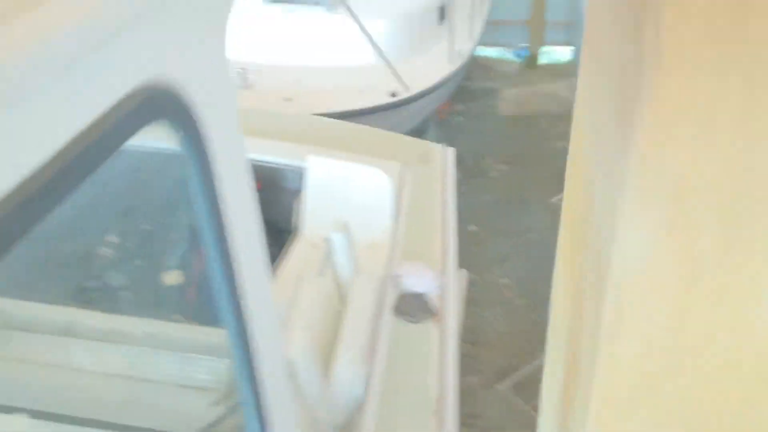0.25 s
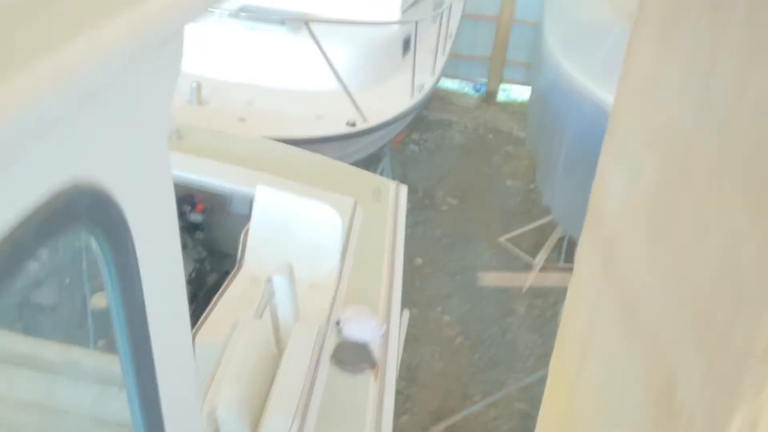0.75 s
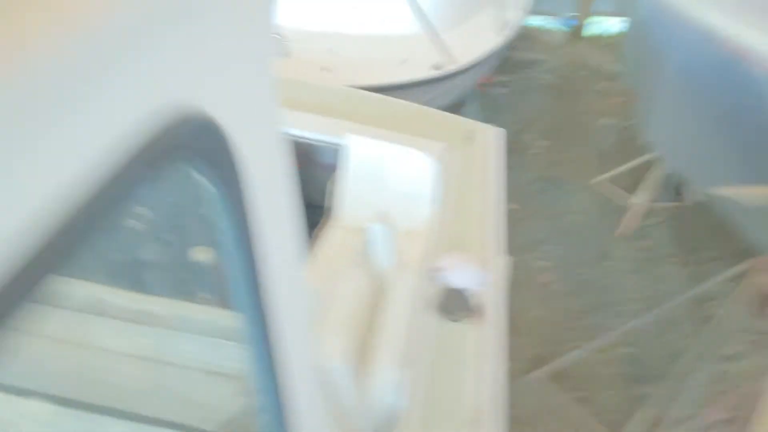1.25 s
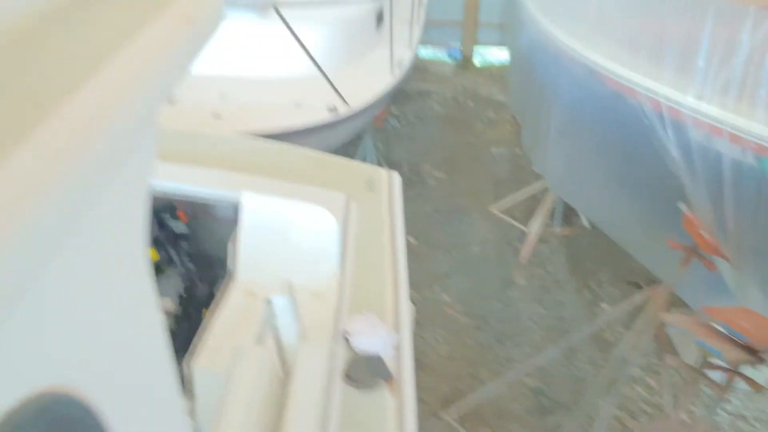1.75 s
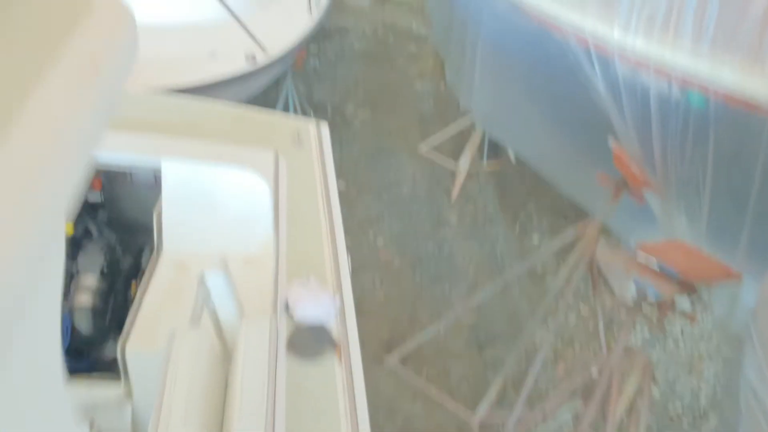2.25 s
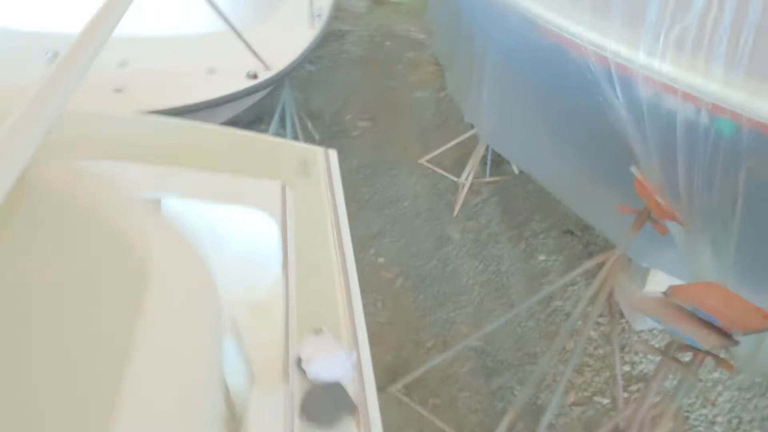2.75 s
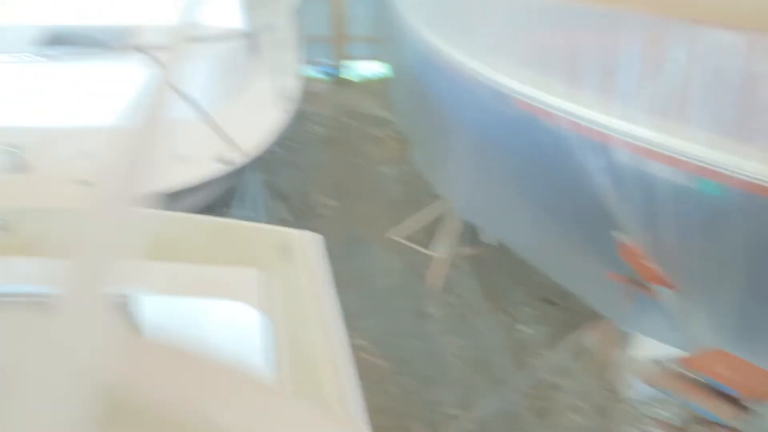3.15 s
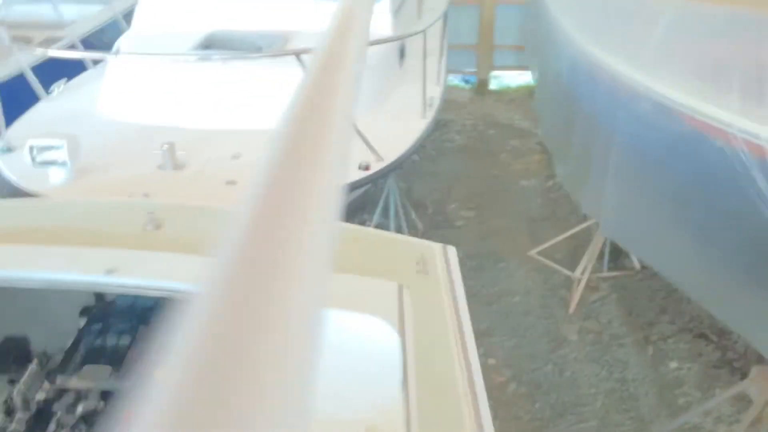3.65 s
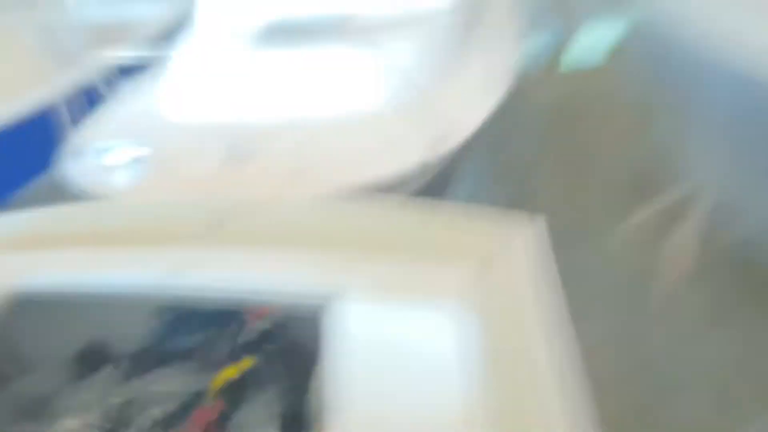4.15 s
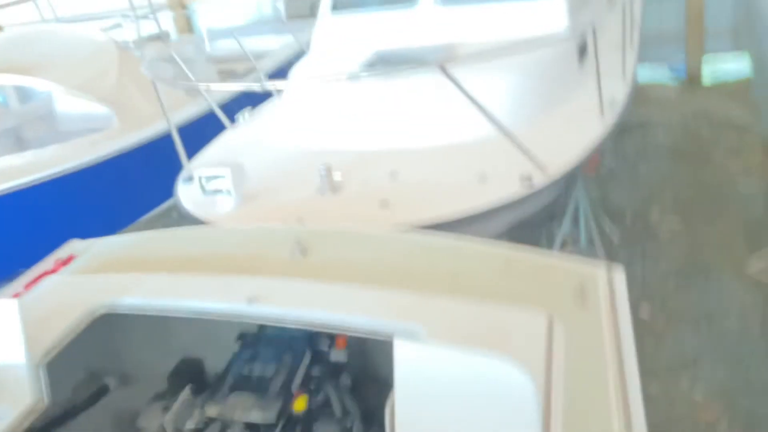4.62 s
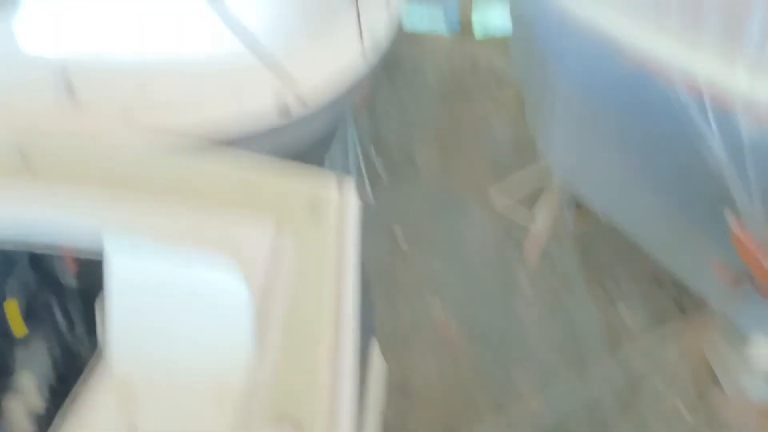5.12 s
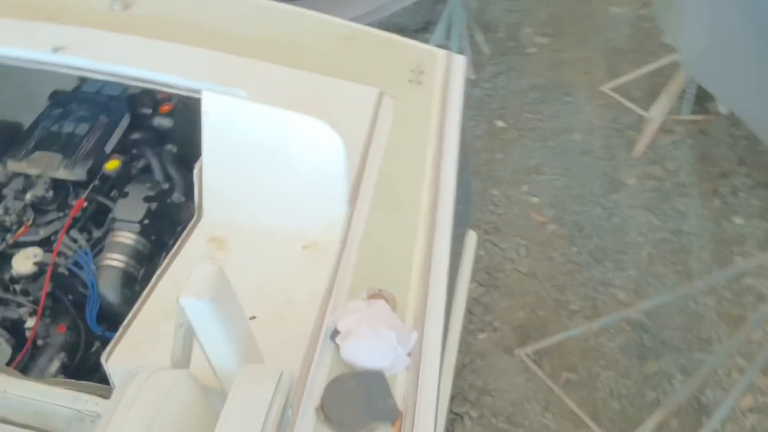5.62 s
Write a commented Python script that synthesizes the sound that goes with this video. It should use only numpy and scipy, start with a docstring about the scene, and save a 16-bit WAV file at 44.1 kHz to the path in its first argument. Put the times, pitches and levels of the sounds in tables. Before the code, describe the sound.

Over faint still air and a wavering low hum, a gritty hollow scrape knocks early and echoes in the shed. Fabric swishes and soft deck steps continue; midway comes a deep hull thump, a tiny squeak and a click. Late, one heavy step bangs loudest, two quicker firm steps follow, then a double click and soft taps. Close, mostly dry handheld camera microphone.

```python
"""Someone steps about on a fibreglass boat in a large shed, over still air, a low wavering hum and a faint ring.
Clothes rustle from the start as patchy friction noise; soles scuff, and small parts click as bands of noise.
After the first step a hollow thing scrapes: gritty force through resonances, then a bump and a falling note.
Heels and light knocks ring deck modes, and the hull booms under the weight; the hardest step comes late,
and at it and two after it the camera's lens rattles. The cockpit and the shed answer with decaying noise."""
import sys
import numpy as np
from scipy import signal
from scipy.fft import rfft, irfft, next_fast_len
from scipy.io import wavfile
from scipy.ndimage import uniform_filter1d, map_coordinates

SR = 44100
rng = np.random.default_rng(int(sys.argv[2]) if len(sys.argv) > 2 else 0)


def int16_out(signal):
    """Quantize to a 16-bit WAV file."""
    q = np.round(np.clip(np.atleast_2d(signal).T, -1, 1) * 32767)
    wavfile.write(sys.argv[1], SR, q.astype(np.int16))


N = 259308
TIME = np.arange(N) / SR
RING = np.arange(SR // 2) / SR  # time since a strike [s]
SCRAPE_AT = 0.541  # s

# footfalls: (time [s], heel gain [dB], contact sharpness [Hz], panel pitch [Hz], panel re heel [dB],
# panel's low mode re heel [dB], cockpit echo re heel [dB], hull gain [dB], jolt of the clothes [dB])
STEPS = [(0.487, -42.5, 960, 414, 14, 8, -6.5, -52, -68), (1.266, -50.5, 865, 416, 12.5, 14, -2, -55, -62),
         (1.3261, -48.5, 930, 574, 4, 1, -7, -50.5, -79), (1.528, -57, 800, 420, 15.5, 9, 1.5, -54, -72),
         (2.4647, -46, 1030, 473, 10.5, -3, 0.5, -46, -57.5),
         (3.299, -52.5, 700, 450, 13, 6, 5.5, -42.5, -51.5),
         (4.0962, -14.5, 2060, 502, -8, 2, -14, -23, -46),
         (4.137, -30, 1410, 430, 3, -4.5, -4.5, -26.5, -61.5),
         (4.5357, -31, 2130, 445, 9.5, -9, -9, -36.5, -63),
         (4.5821, -28.5, 2800, 450, -10, -13.5, -15.5, -37, -65),
         (5.294, -51, 2000, 780, 4, -8, 1, -51.5, -70),
         (5.554, -47, 1430, 495, 12, 5.5, -2.5, -48.5, -52.5)]
# decay of the cockpit echo: (frequency [Hz], t60 [s])
COCKPIT = [(100, 0.69), (500, 0.3), (2000, .18), (6000, 0.24), (14000, 0.12)]


def amp(db):
    """Decibels to gain."""
    return 10 ** (np.asarray(db) / 20)


def unit(x):
    """Scale to rms 1."""
    return x / np.sqrt(np.mean(x ** 2) + 1e-20)


def fade(t, t60):
    """Exponential decay that loses 60 dB in t60."""
    return np.exp(-np.log(1000) * t / t60)


def along(points, hz):
    """Interpolate (Hz, value) points on a log frequency axis."""
    f, v = np.transpose(points)
    return np.interp(np.log(hz + 1), np.log(f), v)


def filtered(x, response):
    """Multiply the spectrum of x by a response of frequency."""
    m = next_fast_len(len(x) + SR // 4)
    spectrum = rfft(x, m) * response(np.fft.rfftfreq(m, 1 / SR))
    return irfft(spectrum, m)[:len(x)]


def band(x, centre_hz, octaves, order=2):
    """A bell on log frequency, rms 1; a higher order gives steeper sides."""
    def bell(f):
        distance = np.abs(np.log2((f + 1) / centre_hz) / octaves)
        return np.exp(-.5 * distance ** order)
    return unit(filtered(x, bell))


def coloured(x, spectrum):
    """Shape x by a (Hz, dB) spectrum, rms 1."""
    return unit(filtered(x, lambda f: amp(along(spectrum, f))))


def wobble(rate):
    """A smooth random curve, rate knots a second."""
    knots = rng.standard_normal(int(N * rate / SR) + 4)
    return map_coordinates(knots, [TIME * rate], order=1)


def grit(depth_db, stutter_db=1.0):
    """Friction noise: countless small slips of uneven strength, bunched where the surface catches."""
    unevenness_db = depth_db * wobble(600) + stutter_db * wobble(110)
    return rng.standard_normal(N) * amp(unevenness_db)


def stroke(s, db, rise, fall):
    """A level that swells to time s and dies away."""
    since = TIME - s
    return amp(db) * np.exp(-np.where(TIME < s, (since / rise) ** 2 / 2, since / fall))


def add(track, s, x):
    """Mix x into the track from time s."""
    part = track[round(s * SR):][:len(x)]
    part += x[:len(part)]


def echo(x, decays, seconds, gap):
    """Diffuse answer of a space that builds up over the gap; each frequency dies at its own speed."""
    hz, t, z = signal.stft(rng.standard_normal(int(seconds * SR)), SR, nperseg=256)
    tail = signal.istft(z * fade(t, along(decays, hz)[:, None]), SR, nperseg=256)[1]
    tail = tail * (1 - np.exp(-(np.arange(len(tail)) / SR / gap) ** 2))
    return signal.fftconvolve(x, tail / np.linalg.norm(tail))


def ring(modes, contact_hz, scatter_db, detune, travel=0.0003):
    """Struck modes; a soft contact leaves those above contact_hz quiet, each strike shifts them a little."""
    hz, db, t60 = np.transpose(modes)
    level_chance, pitch_chance = rng.standard_normal((2, len(hz)))
    gains = amp(db + scatter_db * level_chance) / np.sqrt(1 + (hz / contact_hz) ** 4)
    # bending waves are slower at low pitch: travel is the arrival time at 1 kHz
    t = np.maximum(RING - travel * np.sqrt(10 ** 3 / hz)[:, None], 0)
    pitch = (hz * (1 + detune * pitch_chance))[:, None]
    return gains @ (np.sin(2 * np.pi * pitch * t) * fade(t, t60[:, None]))


def background():
    """Still air as coloured noise; a low hum and a faint room ring as sines wavering in level and phase."""
    # low hum, and a faint ring of the room near 447 Hz: (frequency [Hz], mean level [dB])
    tones = [(59.5, -69.5), (150.5, -73), (210, -74.5), (447, -78.5)]
    # colour of the air: (frequency [Hz], density [dB per Hz])
    air = [(25, -38), (42, -24), (57, -16), (75, -2), (105, -7.5), (150, -9), (260, -12.5), (450, -8.5),
           (700, -19.5), (1500, -21), (4000, -29.5), (9000, -47), (15000, -42.5)]
    tonal = 0
    for hz, db in tones:
        level = amp(db + 1.1 * wobble(1.9)) * np.sqrt(2)
        tonal = tonal + level * np.sin(2 * np.pi * hz * TIME + 1.1 * wobble(2.3))
    return tonal + amp(-64.5) * coloured(rng.standard_normal(N), air)


def swell(s, rise, fall):
    """Speed of a movement that is fastest at time s."""
    shape = 1.33  # between a sharp peak (1) and a rounded bell (2)
    return np.exp(-.5 * (np.abs(TIME - s) / np.where(TIME < s, rise, fall)) ** shape)


def patchy(x, depth_db):
    """Drifting patches of gain in time and pitch, as folds of cloth open and close."""
    z = signal.stft(x, nperseg=512)[2]
    field = uniform_filter1d(rng.standard_normal(z.shape), size=3, axis=0)
    field = uniform_filter1d(field, size=16, axis=1)
    return signal.istft(z * amp(depth_db * unit(field)), nperseg=512)[1][:N]


def clothes(rub_db=2, fizz_db=-5, jolt_fall_s=0.03):
    """Fabric rubs, swishes and fizzes with each movement over a rumble; footfalls jolt it into brief fizz."""
    # body movements: (time when fastest [s], swish [dB], rise [s], fall [s],
    # brightness: fizz up and rub down [dB], rumble [dB])
    moves = [(0.0, -70.5, .05, 0.15, 7.5, -76), (0.45, -65.5, 0.044, 0.047, 3.5, -71),
             (0.74, -79, .15, 0.13, 13, -72), (1.12, -66.5, 0.029, 0.14, 0, -62.5),
             (1.53, -62.5, 0.071, 0.11, 1, -54), (2.2, -78.5, 0.068, 0.3, 0, -75),
             (2.72, -62, 0.11, 0.12, 0.5, -64), (2.87, -61, .025, 0.042, 5.5, -53),
             (3.04, -63, .07, 0.16, -1.5, -56.5), (3.41, -56, 0.11, 0.12, -0.5, -59),
             (3.89, -56, 0.13, .19, 1, -72), (4.43, -59, 0.088, 0.11, 2.5, -68.5),
             (4.8, -54, 0.06, 0.056, 3, -60.5), (5.06, -68, .055, 0.023, 12.5, -85),
             (5.31, -71.5, .035, 0.14, 4.5, -78), (5.69, -73, 0.063, 0.083, 4.5, -69)]
    # colours of the four layers, from low to high: (frequency [Hz], density [dB per Hz])
    rumble = [(50, -23.5), (90, 3.5), (155, 7), (200, -0.5), (320, 0.5), (450, -9.5), (800, -46.5)]
    rub = [(150, -12.5), (300, -3), (500, 3.5), (1000, 1), (1700, -4.5), (2600, -6.5), (5000, -32.5)]
    swish = [(1200, -5), (2300, -3), (3300, -2), (5000, -3), (7000, -9), (9000, -17), (12000, -33.5)]
    fizz = [(6500, -17.5), (9000, -15.5), (11000, -8), (13500, -2), (15800, -2.5)]
    s, db, rise, fall, bright_db, rumble_db = np.transpose(moves)
    power = np.array([swell(at, up, down) for at, up, down in zip(s, rise, fall)]) ** 2

    def level(dbs):
        return np.sqrt(amp(dbs) ** 2 @ power)

    jolts = sum(stroke(step[0], step[-1], rise=0.002, fall=jolt_fall_s) for step in STEPS)
    fizz_level = np.hypot(level(db + fizz_db + bright_db), jolts)
    layers = [(rumble, level(rumble_db)), (rub, level(db + rub_db - bright_db)),
              (swish, level(db)), (fizz, fizz_level)]
    out = np.zeros(N)
    for spectrum, gain in layers:
        friction = coloured(patchy(grit(depth_db=0.5), depth_db=2.0), spectrum)
        out += gain * friction * amp(.8 * wobble(40))
    return out


def scuffs():
    """Soles drag over the deck as swelling bands of friction noise; one gives a short squeak near 3 kHz."""
    # slides, with the narrow squeak at 2.843 s:
    # (time when strongest [s], level [dB], rise [s], fall [s], centre [Hz], width [octaves])
    slides = [(0.219, -62, .012, 0.011, 3700, 0.52), (0.54, -58, 0.0071, .012, 11300, 0.33),
              (1.28, -54.5, 0.0077, 0.013, 2200, 0.58), (1.535, -56, 0.059, .05, 800, 0.94),
              (2.5, -59, 0.029, 0.033, 690, 1), (2.785, -58, 0.019, .015, 4030, 0.65),
              (2.843, -52.5, 0.0019, .022, 3010, 0.1), (2.866, -53, 0.011, 0.021, 3700, 0.74),
              (3.365, -50, .05, 0.066, 1200, 0.81), (3.436, -41, .004, 0.024, 1400, 0.68),
              (3.699, -47.5, 0.022, 0.054, 850, 0.92), (4.609, -41.5, 0.032, 0.042, 850, 0.76)]
    out = np.zeros(N)
    for s, db, rise, fall, hz, octaves in slides:
        out += stroke(s, db, rise, fall) * band(grit(depth_db=2.5, stutter_db=1.5), hz, octaves)
    return out


def noise_burst(hz, octaves, t60):
    """One click or short fizz: a dying band of noise."""
    return band(rng.standard_normal(len(RING)), hz, octaves, order=4) * fade(RING, t60)


def clicks_and_flicks():
    """Small parts click, and cloth flicks in short bright fizzes."""
    # clicks of small parts, and flicks of cloth at 3.139 and 3.723 s:
    # (time [s], level [dB], centre [Hz], width [octaves], t60 [s])
    bursts = [(0.398, -51.5, 11500, 0.9, 0.049), (2.097, -58, 2500, 0.64, .02),
              (2.162, -54, 2330, .6, 0.013), (3.012, -39.5, 2320, 0.25, 0.011),
              (3.0125, -44, 11900, 1, 0.0092), (3.139, -57, 12000, 0.59, .02),
              (3.723, -56, 13000, .4, 0.065), (4.2201, -35, 3850, 0.81, 0.0045),
              (4.851, -38, 3800, 0.85, 0.016), (4.858, -35.5, 3780, 0.88, 0.011),
              (5.866, -60, 12000, 0.81, 0.027)]
    out = np.zeros(N)
    for s, db, hz, octaves, t60 in bursts:
        add(out, s, amp(db) * noise_burst(hz, octaves, t60))
    return out


def lens_rattle(first_db=-7, first_gap_s=0.0055, gap_shrink=0.53):
    """The camera's lens rattles at hard steps: three brief bright clicks, the last two close together."""
    # rattles: (time of the first click [s], level of the other two [dB])
    rattles = [(4.0968, -14), (4.5347, -33), (4.5805, -36.5)]
    out = np.zeros(N)
    clicks = [(0, first_db), (first_gap_s, 0), (first_gap_s * (1 + gap_shrink), 0)]
    for s, db in rattles:
        for delay, click_db in clicks:
            add(out, s + delay, amp(db + click_db) * noise_burst(12400, octaves=0.31, t60=0.0068))
    return out


def boom(firm_hz, life, rise=.005):
    """The hull takes the weight and booms; a planted foot shortens its ring to the share life."""
    # hull modes: (frequency [Hz])
    hull_hz = [54, 67.5, 92, 128, 152, 182, 250, 328, 428, 625]
    # ring of each of those modes: (gain [dB], t60 with no foot planted [s])
    hull_ring = [(-21, 0.35), (-2, 0.32), (-7, 0.25), (-1.5, .3), (-14.5, 0.64), (-28.5, .25), (-0.5, 0.16),
                 (-6.5, 0.35), (5, 0.11), (-24.5, .25)]
    modes = np.column_stack([hull_hz, hull_ring]) * [1, 1, life]
    return ring(modes, firm_hz, scatter_db=4, detune=0.0025) * (1 - np.exp(-RING / rise))


def thumps():
    """Weight moves from foot to foot and only the hull answers."""
    # shifts of weight: (time [s], gain [dB], firmness [Hz])
    shifts = [(2.79, -27, 54.3), (2.895, -40.5, 130), (2.962, -40, 141), (3.345, -45, 89.6),
              (3.582, -49, 120)]
    out = np.zeros(N)
    for s, db, firm_hz in shifts:
        add(out, s, amp(db) * boom(firm_hz, life=0.75))
    return out


def crack(contact_hz, t60=0.02, low_hz=400):
    """The laminate's countless short-lived modes blur into a burst of noise."""
    def slope(f):
        bass_cut = f / np.hypot(f, low_hz)
        softness = (1 + (f / contact_hz) ** 2) ** 0.53
        return bass_cut / softness / np.hypot(1, f / 6000)
    return unit(filtered(rng.standard_normal(len(RING)), slope)) * fade(RING, t60)


def push(hz):
    """The deck dips and springs back under the contact: a cycle and a half."""
    cycles = RING * hz - 1
    return np.sin(2 * np.pi * cycles) * np.exp(-(2 * cycles) ** 2)


def contact(contact_hz, panels, room_db, push_db=9, crack_db=-7, scatter_db=3):
    """A contact pushes the deck, rings laminate and (Hz, dB) modes; cockpit walls throw it back."""
    # deck laminate modes: (frequency [Hz], gain [dB], t60 [s])
    deck = [(268, -15.5, .05), (426, -8, 0.095), (611, 0, 0.022), (773, -4, 0.026), (901, 1, 0.026),
            (996, -17, 0.019), (1120, -6, 0.01), (1425, 1.5, 0.011), (1795, 0.5, 0.0088),
            (2114, 1.5, 0.013), (2300, -11, 0.011), (2770, -16, 0.018), (3560, -19, .012), (4170, -7, .01),
            (5200, 6.5, 0.0073), (6930, -18.5, .008)]
    panel = 0
    for hz, db in panels:
        # each of these modes loses 60 dB in 16 cycles
        envelope = fade(RING, 16 / hz) * (1 - np.exp(-2 * RING * hz))
        panel = panel + amp(db) * np.sin(2 * np.pi * hz * RING) * envelope
    laminate = ring(deck, contact_hz, scatter_db=1.0, detune=0.013) + amp(crack_db) * crack(contact_hz)
    blow = amp(push_db) * push(0.61 * contact_hz) + laminate + panel
    # the whole deck radiates into the cockpit, so the echo is more even in colour than the blow
    spread = .5 * blow + amp(scatter_db) * crack(.5 * contact_hz)
    out = amp(room_db) * echo(spread, COCKPIT, 0.46, gap=0.0061)
    add(out, 0, blow)
    return out


def knocks():
    """Light bumps ring one panel; one at 5.607 s is a low thump of the hull."""
    # bumps: (time [s], gain [dB], contact sharpness [Hz],
    # panel pitch, or hull pitch at 5.607 s [Hz], that mode re bump [dB])
    bumps = [(0.654, -41.5, 2400, 910, -15), (1.588, -56, 800, 326, 14), (1.676, -56.5, 600, 330, 8),
             (1.756, -56.5, 400, 248, 4), (2.003, -64.5, 644, 456, 20.5), (3.435, -48.5, 2280, 1450, -2.5),
             (3.604, -53.5, 3000, 1370, 14.5), (3.658, -56, 1300, 750, 13.5), (3.6784, -44, 2500, 1100, 16),
             (3.6849, -42.5, 1800, 700, 11), (4.22, -41, 3400, 440, 2), (5.260, -51, 2000, 650, -2),
             (5.281, -49.5, 2000, 647, 11.5), (5.607, -59.5, 250, 92, 20), (5.608, -54, 2500, 1184, 5)]
    out = np.zeros(N)
    for s, db, contact_hz, mode_hz, mode_db in bumps:
        add(out, s, amp(db) * contact(contact_hz, [(mode_hz, mode_db)], room_db=-5))
    return out


def scrape(slide_db=-25, bump_db=3, note_db=-25, dull_hz=7500, thin_hz=370, start_hz=540, end_hz=420):
    """Something hollow slides a short way, gritty at first, and bumps to a stop with a falling note."""
    # resonances of the hollow body: (frequency [Hz], width [Hz], relative gain [dB])
    hollow = [(470, 140, 4.5), (718, 65, 5), (956, 145, 8.5), (1426, 85, 7), (1460, 99, 1),
              (1876, 105, 11.5), (2060, 170, 4), (2680, 260, 6), (2830, 130, 4), (3020, 68, -10),
              (3670, 280, -56), (4960, 340, -25), (6800, 250, -8), (6850, 340, -8)]

    def body(f):
        edges = 1 / (1 + (f / dull_hz) ** 8) / (1 + (thin_hz / (f + 1)) ** 6)
        return edges * sum(amp(db) * 1j * f * w / (c * c - f * f + 1j * f * w) for c, w, db in hollow)

    body_gain = np.std(filtered(rng.standard_normal(SR), body))
    force = grit(depth_db=-2.0, stutter_db=0.0) * stroke(SCRAPE_AT, slide_db, rise=0.0043, fall=0.0065)
    bump = signal.windows.hann(SR // 1500)
    add(force, SCRAPE_AT, amp(bump_db) * bump / bump.sum())
    since = np.maximum(TIME - SCRAPE_AT, 0)
    pitch = end_hz + (start_hz - end_hz) * np.exp(-since / 0.0067)
    note = np.sqrt(2) * np.sin(2 * np.pi * np.cumsum(pitch) / SR + .5 * wobble(200))
    note_level = stroke(SCRAPE_AT + 0.0028, note_db, rise=0.0017, fall=0.017)
    return filtered(force, body) / body_gain + note * note_level


def scrape_spray(db=-26.0, centre_hz=1400, octaves=0.81):
    """Away from the microphone the scrape radiates a broader rasp, heard only in the echoes."""
    level = stroke(SCRAPE_AT, db, rise=0.0028, fall=0.0087)
    return level * band(rng.standard_normal(N), centre_hz, octaves)


def footfalls(usual_heel_db=-45.5, weight_lag_s=0.017, usual_firm_hz=190):
    """The heel strikes a deck panel, then the weight settles on the hull."""
    out = np.zeros(N)
    for s, db, contact_hz, panel_hz, panel_db, low_db, room_db, hull_db, _ in STEPS:
        panels = [(panel_hz, panel_db), (0.52 * panel_hz, low_db)]
        add(out, s, amp(db) * contact(contact_hz, panels, room_db))
        # a harder step lands sooner (lag halves per 10 dB) and more firmly (doubles per 28.5 dB)
        harder_db = db - usual_heel_db
        lag = weight_lag_s / 2 ** (harder_db / 10)
        firm_hz = usual_firm_hz * 2 ** (harder_db / 28.5)
        add(out, s + lag, amp(hull_db) * boom(firm_hz, life=0.88))
    return out


def scene():
    """Steps are close and fairly dry; the scrape carries further into the shed."""
    # decay of the shed echo: (frequency [Hz], t60 [s])
    shed_decay = [(80, .7), (200, 0.38), (470, 1.33), (1000, 1.14), (2500, 0.63), (6000, 0.87),
                  (14000, 0.25)]
    steps = footfalls() + knocks() + thumps() + clicks_and_flicks() + lens_rattle() + scuffs()
    direct = scrape()
    far = amp(-4.0) * direct + scrape_spray()
    cockpit = amp(-12.5) * echo(far, COCKPIT, .5, gap=0.0074)[:N]
    shed = echo(amp(-20.5) * steps + amp(-13.0) * far, shed_decay, 2.6, gap=0.022)[:N]
    return (steps + direct + cockpit + shed + clothes() + background())[None]


def record(dry, bottom_hz=46, top_hz=16050):
    """The microphone loses the deepest bass and everything above its band limit."""
    bass_cut = signal.butter(8, bottom_hz, "highpass", fs=SR, output="sos")
    x = signal.sosfilt(bass_cut, dry[0])
    return filtered(x, lambda f: 1 / (1 + (f / top_hz) ** 200))[None]


dry = scene()
out = record(dry)
int16_out(out)
```